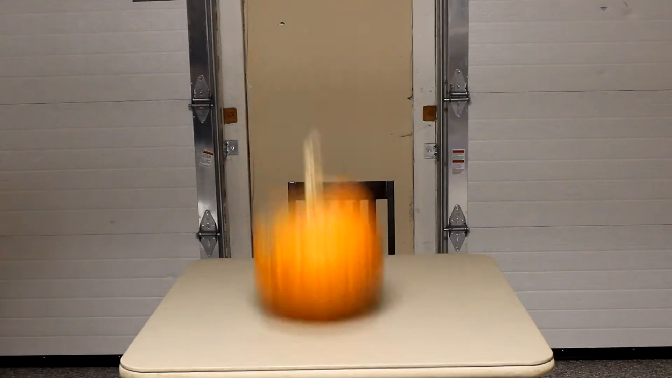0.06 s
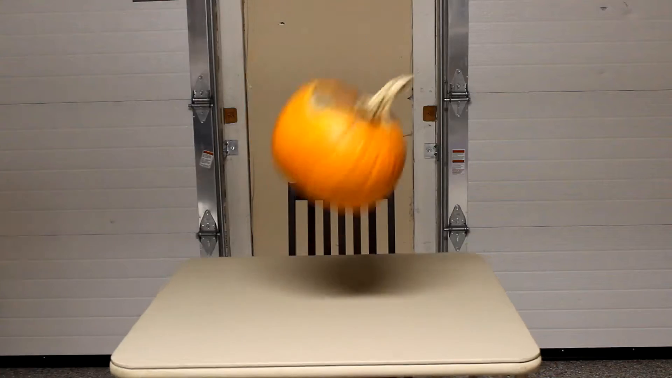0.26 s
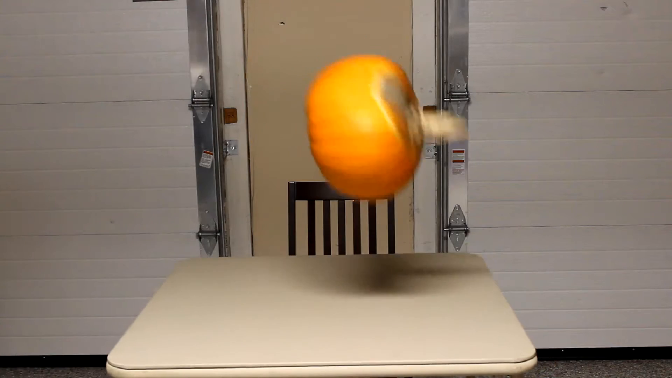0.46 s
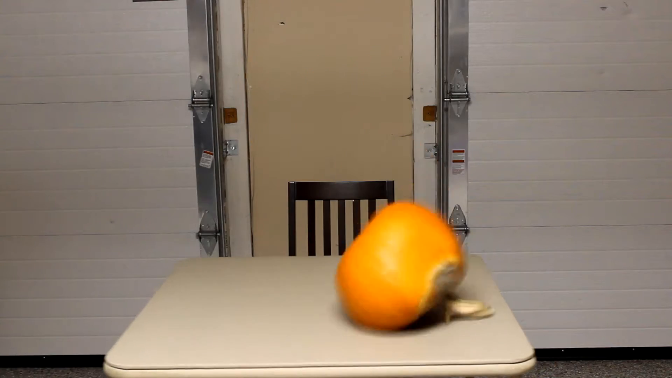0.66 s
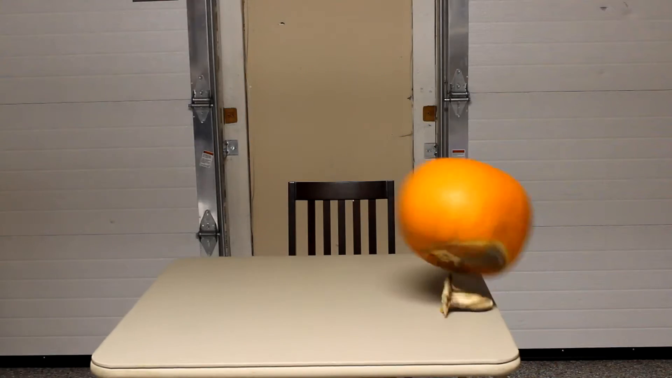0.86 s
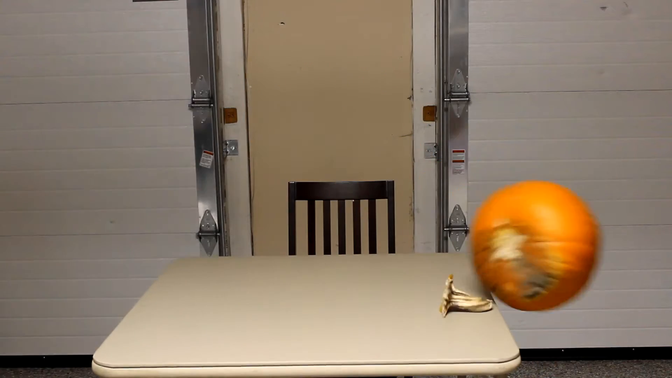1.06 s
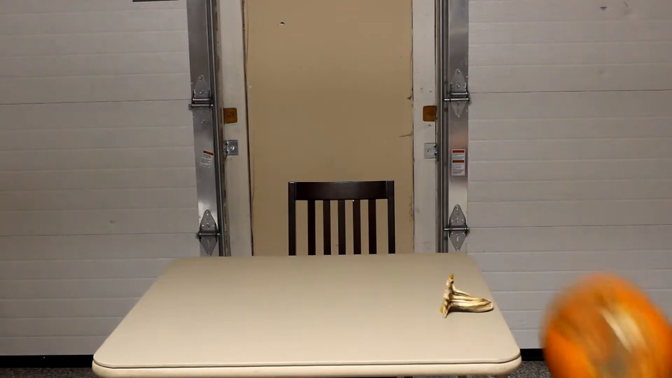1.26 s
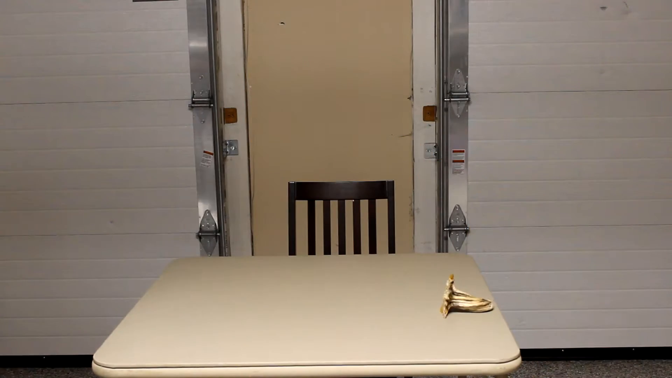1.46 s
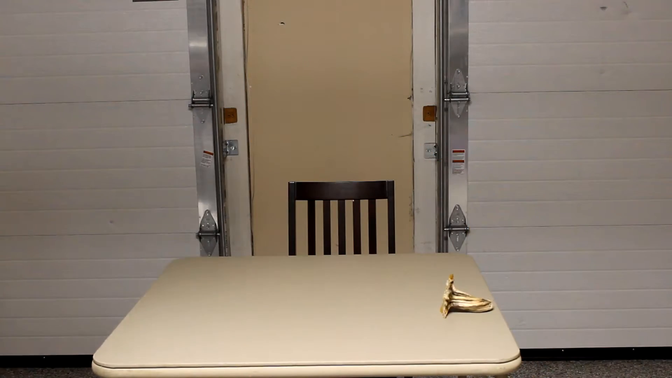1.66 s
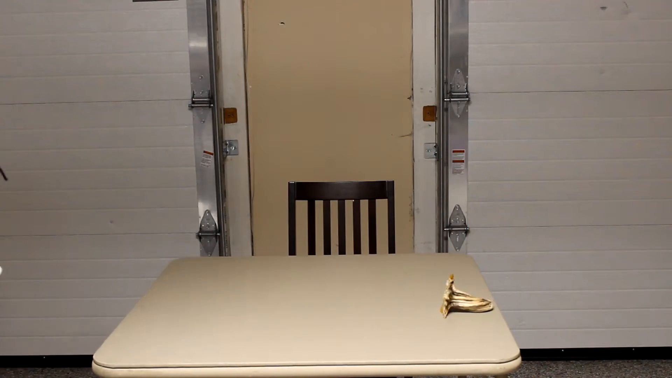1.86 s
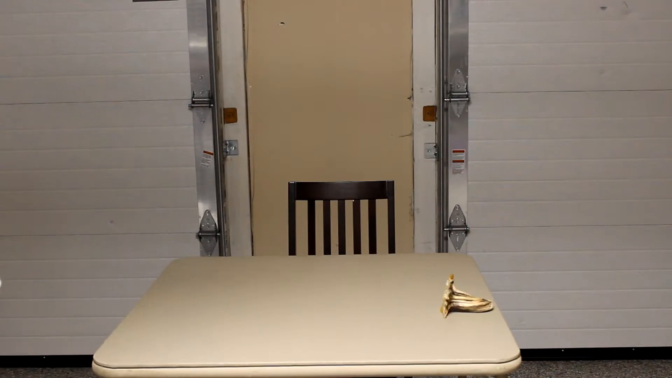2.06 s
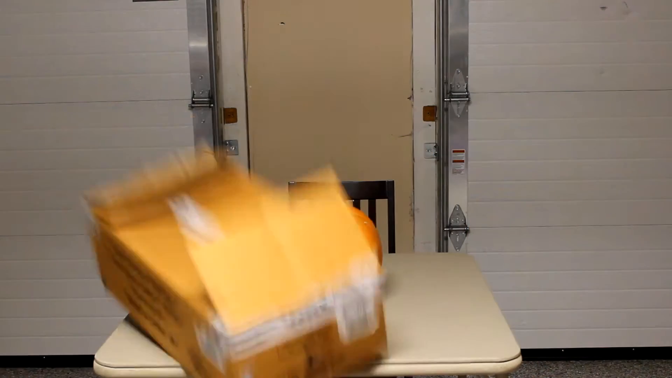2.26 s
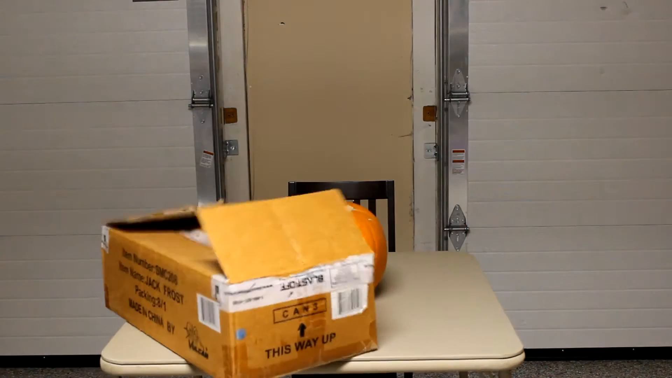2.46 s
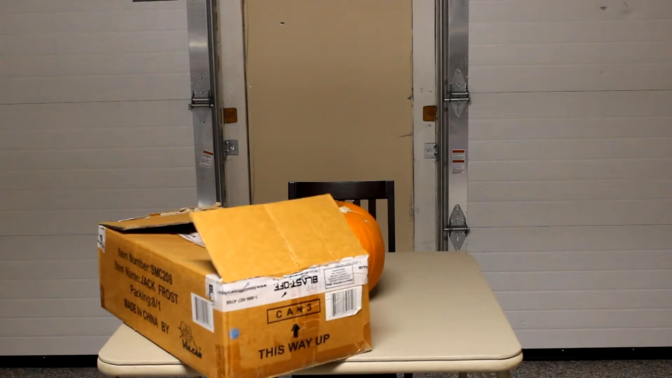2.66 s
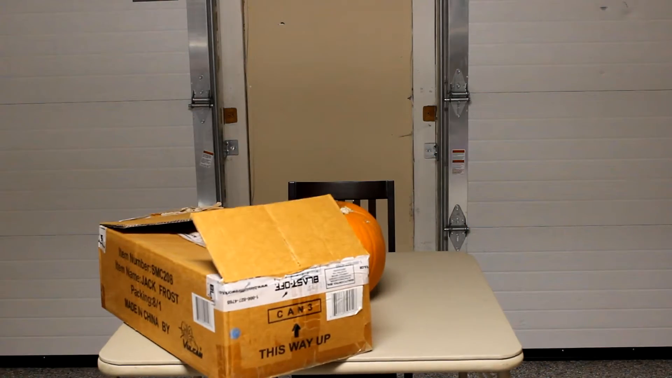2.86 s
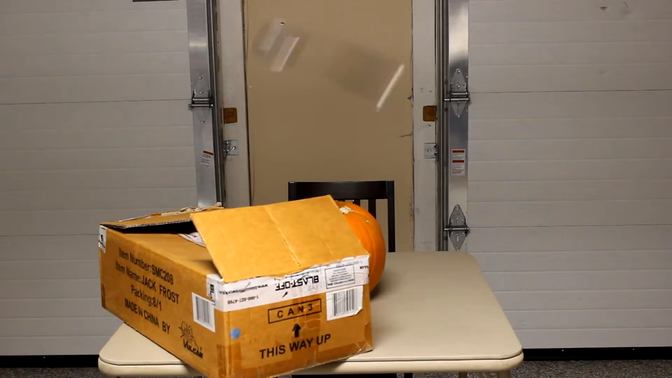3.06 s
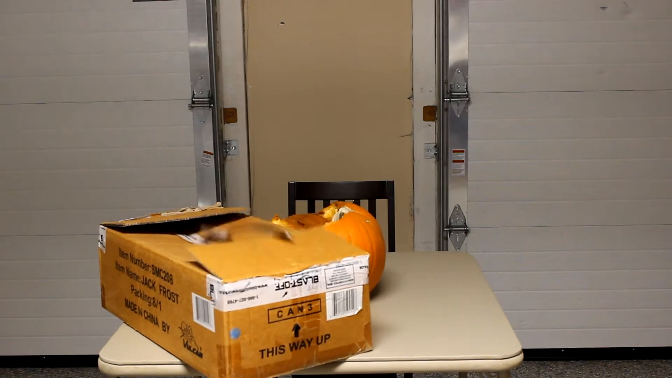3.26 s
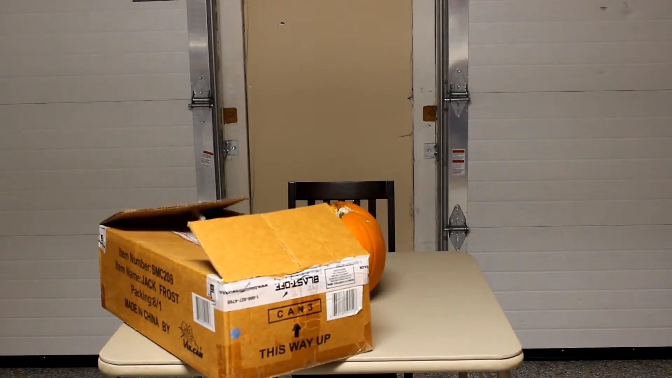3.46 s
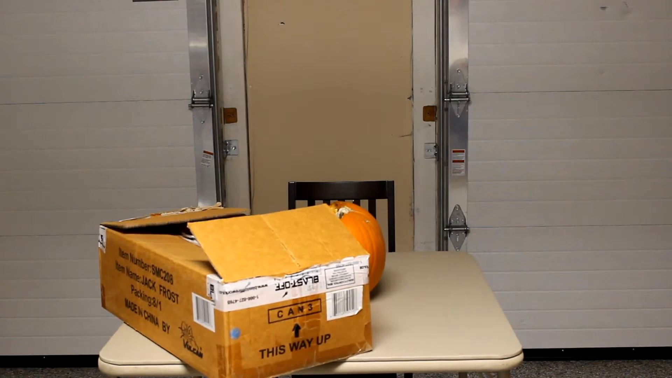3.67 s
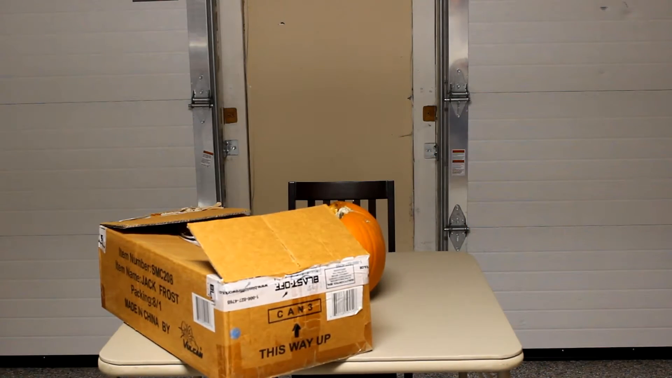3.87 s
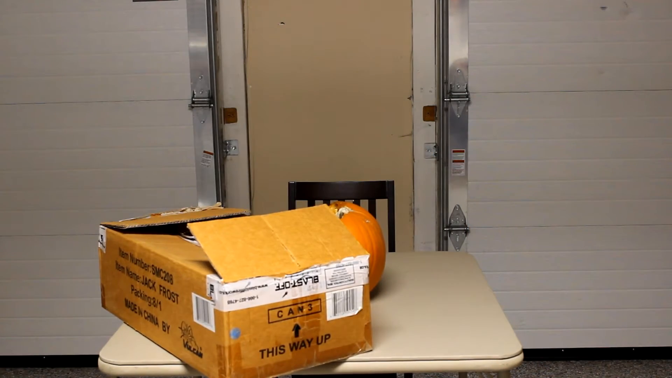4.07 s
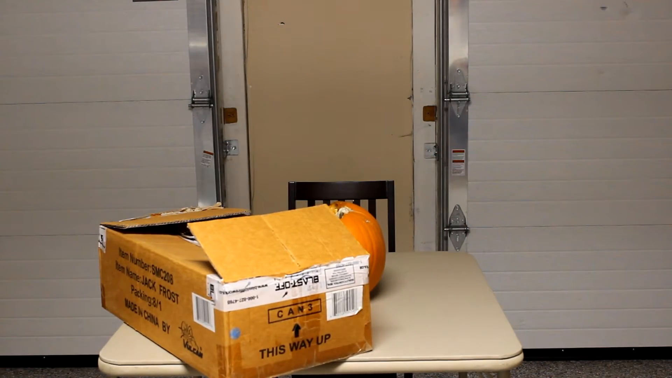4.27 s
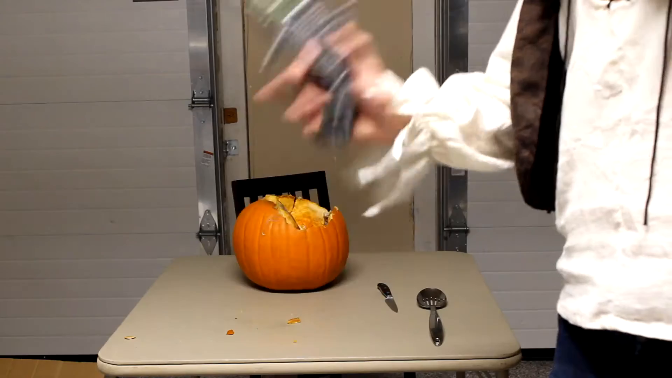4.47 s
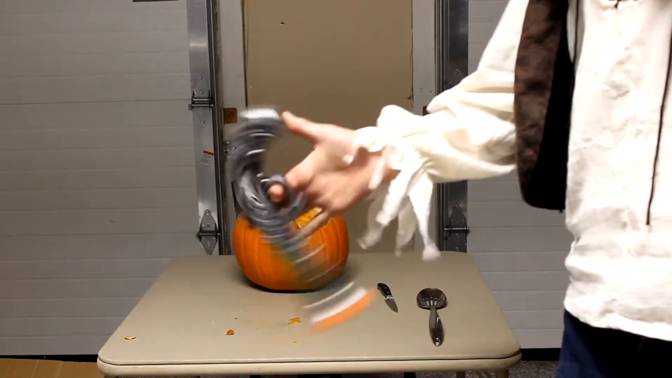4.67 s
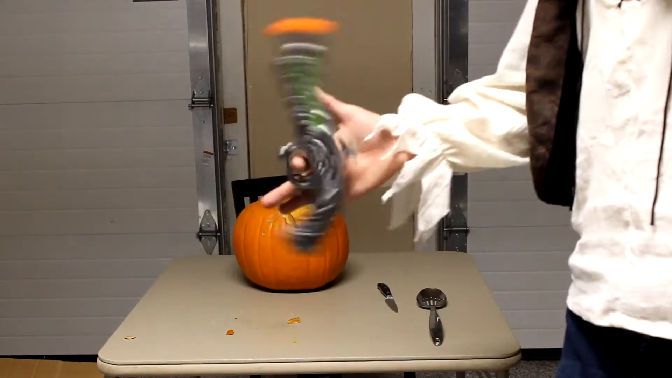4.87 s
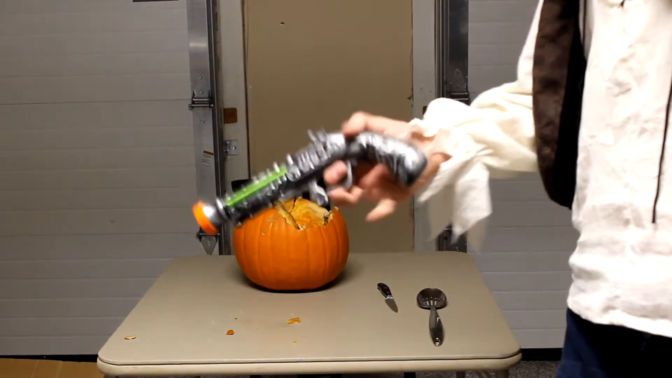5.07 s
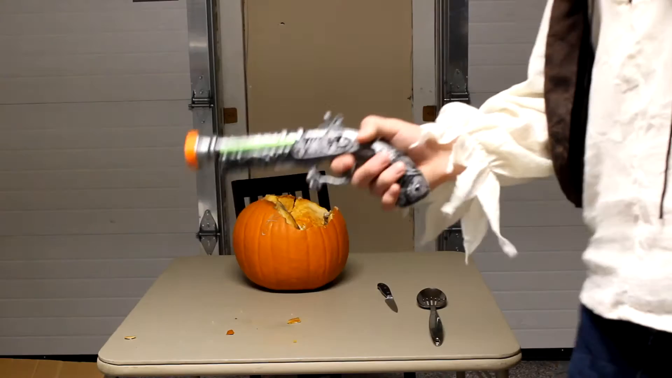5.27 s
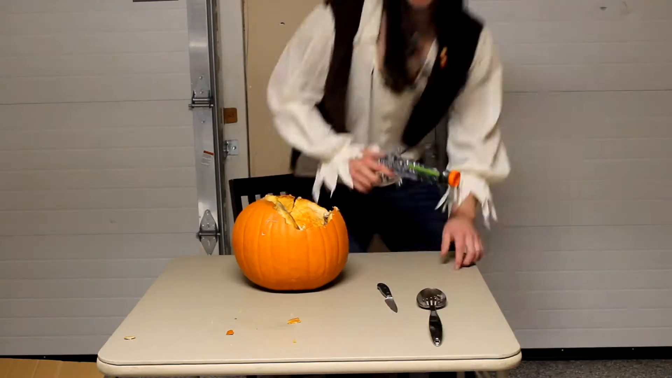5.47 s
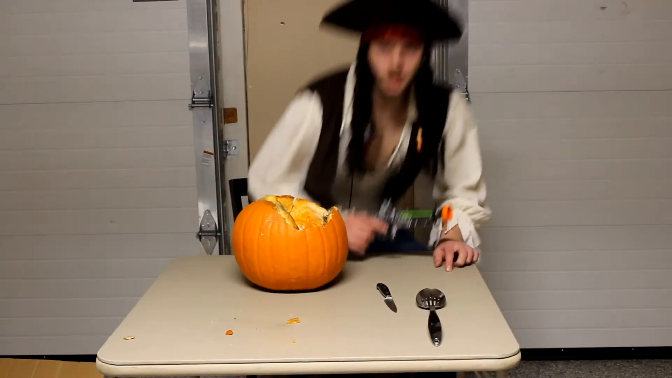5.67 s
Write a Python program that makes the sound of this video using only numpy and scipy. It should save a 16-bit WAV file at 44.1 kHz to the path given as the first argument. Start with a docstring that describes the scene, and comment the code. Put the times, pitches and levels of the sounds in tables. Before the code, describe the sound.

In a bare, slightly echoing garage, a pumpkin thuds hard on a folding table, bounces and rolls off the edge, then lands dully below. After a cut, a cardboard box slaps down and skids. Another cut brings a sharp drop with cutlery ringing and hollow settling. Lastly a plastic toy rattles lightly as sleeves rustle. A camera microphone hisses and clips on the loudest blows.

```python
"""Pumpkins, box and cutlery dropped in a garage

On a folding table in a bare garage, pumpkins, a cardboard box and cutlery land; later a plastic toy is twirled.
Each blow is a push and a clatter of noise through the struck body, then floor, near wall and a diffuse tail.
Noise bands make the rolling, skidding, cloth and room tone; decaying sines make the steel ring.
Cuts end the sounds of each shot, some with a short gap, and the loudest peaks clip."""
import sys
import numpy as np
from scipy import signal
from scipy.fft import rfft, irfft, next_fast_len
from scipy.io import wavfile
from scipy.ndimage import uniform_filter1d, map_coordinates

SR = 44100
rng = np.random.default_rng(int(sys.argv[2]) if len(sys.argv) > 2 else 0)


def log_audio(samples):
    """Write samples as a 16-bit WAV file to the path given in sys.argv[1]."""
    # one column per channel
    frames = np.atleast_2d(samples).T
    # limit to full scale, then quantise
    limited = np.clip(frames, -1, 1)
    pcm = np.round(limited * 32767).astype(np.int16)
    wavfile.write(sys.argv[1], SR, pcm)


N = 252688  # length in samples

# Edges of the shots. Each entry: time in seconds.
CUTS = [.043, 2.315, 3.015, 4.513, 5.527, 6]
# Hiss and low rumble at rest. Each entry: level of one shot in dB.
HISS_DB = [-54, -54, -55.5, -55, -48.5]
RUMBLE_DB = [-65.5, -69.5, -71, -66, -59]
# Spectra of the hiss and the rumble. Each row: frequency in Hz, relative density in dB per Hz.
HISS = [(53, -32), (90, -11.5), (155, -8.5), (201, -17.5), (249, -11.5), (1320, -16), (1470, -19),
        (1720, -17), (4360, -21.5), (16000, -32)]
RUMBLE = [(15, -14.5), (30, -5.5), (50, -1.5), (68, 5.5), (90, -25), (130, -65)]

# Pumpkins on the table, with two faint bright ticks; soft bumps and low rings of the table;
# the box on the table, and a last dull thump.
# Each row: start in seconds, relative level in dB, weight (bass) in dB, hardness (treble) in dB,
# clatter t60 in seconds.
PUMPKIN = [(0.078, -34, 16.5, -5.5, 0.14), (0.136, -32.5, -7, -2, 0.27), (0.1865, 11.5, -5, -2.5, 0.076),
           (0.649, -48.5, -3, 21, 0.14), (0.745, 3.5, -0.5, -7, 0.16), (1.061, -30, -3, -11, 0.049),
           (1.084, -25, 0.5, -2, 0.1), (1.309, -25, -10.5, 6, 0.095), (1.379, -29, 6.5, 8, 0.076),
           (1.535, 4, 3, 1, 0.076), (1.873, -40.5, -14, 20, 0.12)]
BUMPS = [(0.342, -18.5, 9, 7.5, 0.34), (0.385, -17.5, 5.5, 3, 0.42), (1.046, -18.5, 3, -8, 0.13),
         (1.345, -21, -2, 3.5, 0.14), (2.43, 9, -10, -11, 0.064), (2.654, -6.5, 6, -8, 0.11),
         (2.674, -7, -23, -3, 0.054), (3.42, -35.5, 17, -8, 0.64), (3.82, -29, -4, 7, 0.17),
         (3.885, -30, 4.5, -2, 0.2), (5.534, -33.5, -1, 12, 0.12), (5.585, -35.5, 6, 5, 0.16),
         (5.666, -34, -21, 3, 0.24)]
BOX = [(2.383, 3.5, 6.5, 5, 0.061), (2.48, -11, -14.5, -11, .05), (2.593, -15, -6, 1.5, 0.047),
       (2.651, -20.5, -1, 7.5, .05), (2.702, -19, 1, -14, .05), (2.781, -13.5, 1.5, -3, 0.058),
       (2.792, -1, -4, -14.5, 0.08), (3.29, 3.5, 2.5, 5, 0.033), (3.328, -11, 0, 2.5, 0.035),
       (3.337, -0.5, 0, 8, 0.0423), (5.72, -20.5, -2.5, -5, 0.057)]
# The pumpkin settles in the box. Each row: start in seconds, relative level in dB, weight in dB.
INSIDE = [(3.573, -2, -5), (3.585, -9, -3.5), (3.61, -16.5, 3.5), (3.635, -16, 3), (3.684, -17, 4),
          (3.76, -26, 10.5)]
# The toy rattles. Each row: start in seconds, relative level in dB, hardness in dB.
TOY = [(4.517, -27.5, -4), (4.609, -15, -4.5), (4.623, -17, -7), (4.782, -31, -11), (4.815, -17, -3.5),
       (4.837, -28, 20), (4.861, -13, 2.5), (4.885, -10, -9), (5.01, -20.5, -5), (5.028, -23, 2),
       (5.129, -33, 12), (5.141, -13, -2.5), (5.147, -15, 12), (5.159, -14.5, 7.5), (5.209, -14, -5),
       (5.275, -19, -3), (5.327, -37, -6), (5.455, -27, 17.5), (5.494, -28, -6.5)]
# Loose contacts after each blow. Each row: delay in seconds, relative level in dB.
PUMPKIN_CHATTER = [(0.0104, -4.5), (.022, -7.5)]
BOX_CHATTER = [(.01, -7), (.022, -13)]

# Resonances of the table top, the box on the table, the pumpkin in the box and the toy's shell.
# Each row: centre in Hz, width in Hz, lift in dB.
TABLE = [(138.3, 16, 9.5), (177, 17, 8), (264, 40, 5.5), (387, 62, 4.5), (551, 58, 4.5), (993, 180, -7),
         (1463, 83, 2.5), (1950, 160, -1), (2260, 46, -2.5)]
CARD = [(162, 44, 7), (203, 35, 4.5), (249, 40, -3), (302, 30, 1.5), (383.6, 49, 5.5), (700, 62, 1.5),
        (1230, 60, 3), (1670, 250, -1.5)]
HOLLOW = [(150.4, 16.4, 14), (282, 14, 8.5), (414, 51, 12.5), (513, 66, 2), (636, 94, 8), (1058, 110, 4.5)]
PLASTIC = [(780, 82, -15), (1130, 500, 3.5), (1940, 36, 2), (2700, 32, 6), (4400, 110, 2), (6600, 210, -15)]
# Contact colour: pumpkin on table, soft bumps, card on table, pumpkin on card, plastic on plastic.
# Each row: frequency in Hz, gain in dB.
FLESH = [(15, -19), (55, -5.5), (95, -5.5), (150, 3), (320, 2), (800, 1), (2800, -9.5), (9000, -21.5),
         (16000, -26.5)]
SOFT = [(15, -20.5), (55, -8), (95, -12), (150, -1), (320, -2), (800, -1.5), (2800, -18.5), (9000, -26.5),
        (16000, -26)]
FLAP = [(15, -35), (55, -24.5), (95, -2.5), (150, 2.5), (320, 4), (800, 1.5), (2800, -14.5), (9000, -24.5),
        (16000, -37)]
NEST = [(15, -31), (55, -28), (95, 0), (150, -6), (320, 4.5), (800, -1.5), (2800, -22), (9000, -32),
        (16000, -37.5)]
SHELL = [(15, -54), (55, -40), (95, -46), (150, -38), (320, -22), (800, -0.5), (2800, -8), (9000, -19.5),
         (16000, -19.5)]

# First echoes, off the floor and the near wall. Each row: delay in seconds, relative level in dB.
ECHOES = [(.0045, -12), (.0095, -14.5)]
# Reverberation of the bare garage. Each row: frequency in Hz, t60 in seconds.
GARAGE = [(60, 0.81), (160, 0.57), (420, 0.52), (1100, 0.64), (2900, 0.64), (7700, 0.4), (15000, 0.13)]

# The pumpkin rolls to the edge, the table sways as the weight leaves, the edge squeaks, the box skids,
# sleeves rustle. Each row: time in seconds, level in dB.
ROLL = [(0.95, -37), (1.024, -46), (1.064, -36.5), (1.254, -44.5), (1.278, -51.5), (1.388, -46),
        (1.418, -47.5), (1.478, -55), (1.5, -58)]
SHAKE = [(1.05, -75), (1.1, -41), (1.2, -44.5), (1.32, -50), (1.4, -67)]
SQUEAK = [(1.3, -77), (1.31, -48), (1.37, -45.5), (1.44, -62)]
SLIDE = [(2.64, -31), (2.658, -23.5), (2.672, -17), (2.746, -35.5), (2.8, -26.5)]
CLOTH = [(4.515, -54), (4.8, -55), (5.1, -59), (5.4, -51), (5.52, -52), (5.535, -44.5), (5.62, -50.5),
         (5.73, -42.5)]
# Spectra of the rolling and the sleeves. Each row: frequency in Hz, relative density in dB per Hz.
ROLLING = [(47, -41), (80, -24), (176, -2), (655, -6.5), (930, -17), (1790, -16.5), (2490, -20),
           (15000, -37.5)]
RUSTLE = [(59, -38.5), (100, -13.5), (399, 6.5), (472, -2.5), (780, 4.5), (923, -9), (1530, -4),
          (15000, -23)]
# Resonances of the skidding box. Each row: centre in Hz, width in Hz, weight in dB before sharpening.
SKID = [(476, 74, 1.5), (840, 130, -9), (1150, 110, -4.5), (1270, 93, -1.5)]

# Cutlery ringing. Each row: frequency in Hz, starting amplitude in dB, t60 in seconds.
STEEL = [(1480, -30, .41), (1600, -31, 0.34), (1800, -35, .49), (4720, -47.5, 0.79), (4940, -45, 1),
         (5109, -46.5, 1.2), (5227, -49, .8), (6630, -41, .45), (7510, -45.5, 0.22)]
# Cutlery settling. Each row: start in seconds, relative level in dB.
TICKS = [(3.464, -44), (3.5049, -35.5), (3.5214, -44), (3.5585, -40), (3.5828, -40), (3.6202, -34.5),
         (3.674, -32), (3.7044, -43), (3.765, -34.5), (3.8242, -41.5)]
# A far machine in the last two shots. Each row: frequency in Hz, level in dB rms.
HUM = [(43.1, -61.5), (64.6, -61)]

# weight acts fully below the first, hardness fully above the last, neither at the middle one
HEAVY_HZ, MID_HZ, HARD_HZ = 308, 750, 9000
SNAP_T60 = .003  # skins meet before the bodies move (s)
INSIDE_T60, TOY_T60 = 0.042, 0.046  # clatter (s)
STEEL_S = 3.338  # the cutlery lands (s)
SKID_SAG = .6  # the skid's pitch falls by this share a second as the box slows
TOP_HZ = 15900  # band limit


def amp(db):
    """Decibels to a linear gain."""
    return 10 ** (np.asarray(db) / 20)


def unit(x):
    """Scale to rms 1."""
    return x / np.sqrt(np.mean(x ** 2) + 1e-20)


def along(points, hz):
    """Read (Hz, value) points on a log frequency axis."""
    f, v = np.transpose(points)
    return np.interp(np.log(hz + 1), np.log(f + 1), v)


def curve(rows):
    """A gain per sample, practically silent outside the rows."""
    s, db = np.transpose(rows)
    return amp(np.interp(np.arange(N) / SR, s, db, -120, -120))


def noise(gain):
    """Noise of rms 1 with a gain over frequency."""
    m = next_fast_len(N)
    spectrum = rfft(rng.standard_normal(m)) * gain(np.fft.rfftfreq(m, 1 / SR))
    return unit(irfft(spectrum, m)[:N])


def coloured(points):
    """Noise of rms 1 with a spectrum drawn through (Hz, dB) points."""
    return noise(lambda hz: amp(along(points, hz)))


def resonances(modes, f):
    """Gain of a set of resonances, their powers summed."""
    power = 0
    for centre, width, db in modes:
        damping = (f * width) ** 2
        power = power + amp(2 * db) * damping / ((centre * centre - f * f) ** 2 + damping)
    return np.sqrt(power)


def causal(gain):
    """The minimum-phase impulse response with this gain: its energy comes as early as it can."""
    cepstrum = irfft(np.log(gain + 1e-6))
    half = len(cepstrum) // 2
    cepstrum[1:half] *= 2
    cepstrum[half + 1:] = 0
    return irfft(np.exp(rfft(cepstrum)))[:half]


def walls(dry):
    """A fresh diffuse tail that builds up, each frequency dying at its own speed."""
    hz, t, z = signal.stft(rng.standard_normal(SR), SR, nperseg=256)
    fading = z * amp(-60 * t / along(GARAGE, hz)[:, None])
    tail = signal.istft(fading, SR, nperseg=256)[1]
    tail = tail * (1 - np.exp(-np.arange(len(tail)) / SR / 0.0015))
    return signal.fftconvolve(dry, tail / np.linalg.norm(tail))


def add(out, s, sound):
    """Lay a sound in; the next cut ends it."""
    start = round(s * SR)
    cut = round(min(c for c in CUTS if c > s) * SR)
    end = min(cut, N, start + len(sound))
    out[start:end] += sound[:max(end - start, 0)]


def stirred(hits, quiet_db, top_db, slope, lag_s):
    """A gain that rests at each shot's level and swells behind the blows until the next cut."""
    keep = np.exp(-1 / (lag_s * SR))
    edges = np.round(np.multiply(CUTS[1:-1], SR)).astype(int)
    gains = []
    for rest_db, shot in zip(quiet_db, np.split(hits ** 2, edges)):
        power = signal.lfilter([1 - keep], [1, -keep], shot)
        # top_db is the swell at full scale, slope its dB per dB of blow
        gains.append(np.hypot(amp(rest_db), amp(top_db) * power ** (slope / 2)))
    return np.concatenate(gains)


def hiss(hits):
    """Room tone and camera hiss: shaped noise that swells after blows."""
    return stirred(hits, HISS_DB, top_db=-35, slope=0.57, lag_s=0.026) * coloured(HISS)


def rumble(hits):
    """Low rumble: bass noise that swells after blows."""
    return stirred(hits, RUMBLE_DB, top_db=-44, slope=0.45, lag_s=0.053) * coloured(RUMBLE)


def blows(rows, modes, contact, chatter, rise_s, push, crack, snap_db, lumpy_db, wet_db):
    """One push, then a lumpy clatter, coloured by weight, hardness and the body's resonances."""
    out, t = np.zeros(N), np.arange(SR // 4) / SR
    hz = np.fft.rfftfreq(8192, 1 / SR)
    body = np.sqrt(1 + resonances(modes, hz) ** 2) * amp(along(contact, hz))
    low = along([(HEAVY_HZ, 1), (MID_HZ, 0)], hz)
    high = along([(MID_HZ, 0), (HARD_HZ, 1)], hz)
    for first_s, db, weight_db, hard_db, t60 in rows:
        colour = causal(amp(weight_db * low + hard_db * high) * body)
        fall = amp(-60 * t / t60)
        shape = (1 - np.exp(-t / rise_s)) * fall
        for late, loss_db in [(0, 0)] + chatter:
            # the clatter's strength jumps every 64 samples
            steps = np.repeat(rng.standard_normal(len(t) // 64 + 1), 64)[:len(t)]
            force = amp(lumpy_db * steps) * shape * rng.standard_normal(len(t))
            force *= np.linalg.norm(shape) / np.linalg.norm(force)
            # the treble of the clatter dies first
            slow = uniform_filter1d(force, size=9)
            force = slow + (force - slow) * fall ** 0.61
            # the contact: a rounded push with a crack on top
            force[:12] += push * np.hanning(12) / 5
            force += crack * amp(-60 * t / 0.013) * rng.standard_normal(len(t))
            s, gain = first_s + late, amp(db + loss_db)
            dry = gain * signal.fftconvolve(force, colour)
            add(out, s, dry)
            snap = amp(snap_db + hard_db - 60 * t[:400] / SNAP_T60) * np.diff(rng.standard_normal(401))
            add(out, s, gain * snap)
            for delay, echo_db in ECHOES:
                add(out, s + delay, amp(echo_db) * dry)
            strength = np.hypot(push, np.linalg.norm(shape))
            add(out, s, gain * amp(wet_db) * strength * walls(colour))
    return out


def pumpkin_blows():
    """Pumpkins thud on the table top, with two faint bright ticks; loose contacts follow each blow."""
    return blows(PUMPKIN, TABLE, FLESH, PUMPKIN_CHATTER, rise_s=0.0049, push=-9, crack=0.94,
                 snap_db=-25.5, lumpy_db=3.6, wet_db=-8.0)


def table_bumps():
    """Soft bumps and low rings of the table: a slow-rising clatter with no push or crack."""
    return blows(BUMPS, TABLE, SOFT, [], rise_s=0.0066, push=0, crack=0,
                 snap_db=-45, lumpy_db=1.8, wet_db=0.0)


def pumpkin_roll():
    """The pumpkin rumbles over the top and off the edge: noise with a drawn level."""
    return curve(ROLL) * coloured(ROLLING)


def table_sway():
    """The table sways as the weight leaves: noise in one low resonance."""
    return curve(SHAKE) * noise(lambda hz: resonances([(53.7, 10.4, 0)], hz))


def edge_squeak():
    """A thin squeak at the table's edge: noise in one narrow, sharpened resonance."""
    return curve(SQUEAK) * noise(lambda hz: resonances([(1866, 41, 0)], hz) ** 2)


def box_blows():
    """The cardboard box slaps the table, and a last dull thump: quick, very lumpy clatters."""
    return blows(BOX, CARD, FLAP, BOX_CHATTER, rise_s=0.0011, push=-6.5, crack=1.45,
                 snap_db=-24.5, lumpy_db=8.8, wet_db=-3.0)


def box_skid():
    """The box skids unevenly: noise in its own resonances, sinking in pitch, with the walls behind."""
    stick = amp(4.5 * unit(uniform_filter1d(rng.standard_normal(N), size=120)))
    since = np.clip(np.arange(N) / SR - SLIDE[0][0], 0, .5)
    # reading the noise ever more slowly lowers its pitch
    slowed = np.arange(N) - SKID_SAG * since ** 2 / 2 * SR
    scrape = noise(lambda hz: resonances(SKID, hz) ** 1.63)
    skid = curve(SLIDE) * unit(stick * map_coordinates(scrape, [slowed]))
    before_cut = np.arange(N) < CUTS[2] * SR
    return skid + amp(-3) * walls(skid)[:N] * before_cut


def cutlery():
    """Steel rings thinly after the drop, as wavering sines, and ticks while it settles."""
    out, t = np.zeros(N), np.arange(SR // 2) / SR
    for hz, db, t60 in STEEL:
        waver = np.cumsum(rng.normal(0, 0.02, len(t)))
        add(out, STEEL_S, amp(db - 60 * t / t60) * np.sin(2 * np.pi * hz * t + waver))
    for s, db in TICKS:
        bright = np.diff(rng.standard_normal(602), 2)
        add(out, s, amp(db - 60 * t[:600] / 0.006) * bright * 0.4)
    return out


def pumpkin_in_box():
    """The pumpkin settles in the box: strong pushes into a hollow body."""
    rows = [(*row, 0, INSIDE_T60) for row in INSIDE]
    return blows(rows, HOLLOW, NEST, [], rise_s=0.0011, push=11.8, crack=1.3,
                 snap_db=-25, lumpy_db=3.2, wet_db=-1.5)


def far_hum():
    """A far machine hums: low sines whose phase drifts."""
    t = np.arange(N) / SR
    hum = np.zeros(N)
    for hz, db in HUM:
        drift = np.cumsum(rng.normal(0, 0.0027, N))
        hum += amp(db) * np.sqrt(2) * np.sin(2 * np.pi * hz * t + drift)
    return hum * (t > CUTS[3])


def sleeves():
    """Sleeves rustle: mid-range noise with a drawn level."""
    return curve(CLOTH) * coloured(RUSTLE)


def toy_rattle():
    """The twirled toy rattles: short, lumpy blows through a plastic shell."""
    rows = [(s, db, 0, hard_db, TOY_T60) for s, db, hard_db in TOY]
    return blows(rows, PLASTIC, SHELL, [], rise_s=0.0017, push=1.1, crack=0.98,
                 snap_db=-24.5, lumpy_db=9.5, wet_db=-2)


def scene():
    """Sum blows, friction and steel, the hiss and rumble that swell after blows, the hum and the sleeves."""
    hits = pumpkin_blows() + table_bumps() + box_blows() + pumpkin_in_box() + toy_rattle()
    friction = pumpkin_roll() + table_sway() + edge_squeak() + box_skid()
    background = hiss(hits) + rumble(hits) + far_hum() + sleeves()
    return (hits + friction + cutlery() + background)[None]


def record(dry):
    """The camera's microphone clips, some cuts leave a short gap, and a band limit removes the top."""
    x = np.clip(dry, -.99, .99)
    t = np.arange(N) / SR
    opening = CUTS[0] - .003
    for s in opening, CUTS[1], CUTS[2], CUTS[4]:
        # silent within 1 ms of the cut, full again by 4.3 ms
        x = x * np.clip(np.abs(t - s) / 0.0033 - .3, 0, 1)
    x = x * (t > opening)
    m = next_fast_len(N + SR)
    held = np.pad(x, ((0, 0), (0, m - N)), mode="linear_ramp")
    return irfft(rfft(held) * (np.fft.rfftfreq(m, 1 / SR) < TOP_HZ), m)[:, :N]


dry = scene()
out = record(dry)
log_audio(out)
```